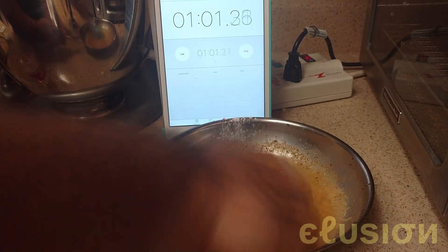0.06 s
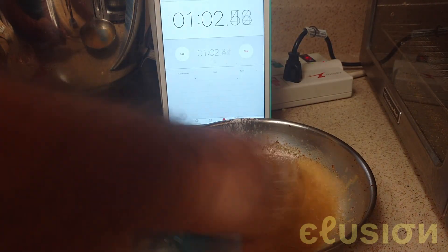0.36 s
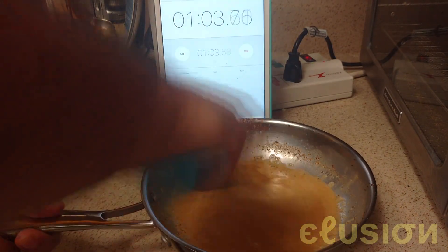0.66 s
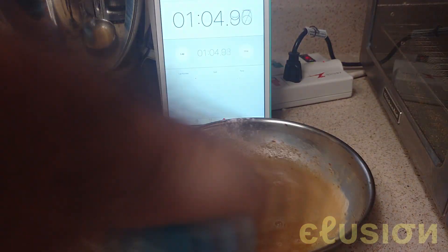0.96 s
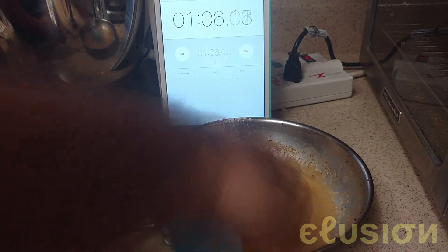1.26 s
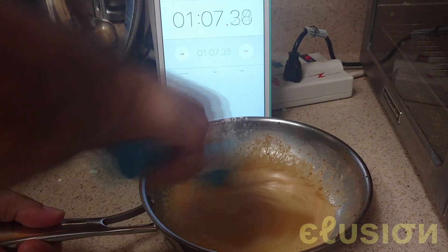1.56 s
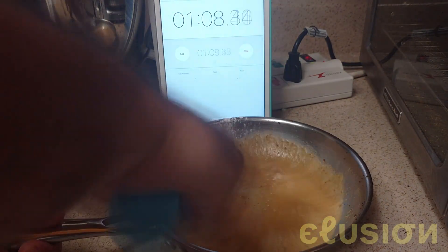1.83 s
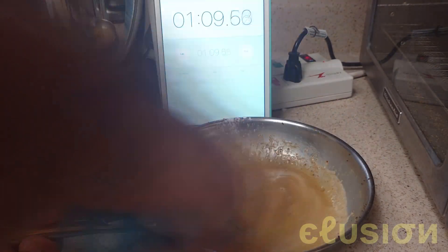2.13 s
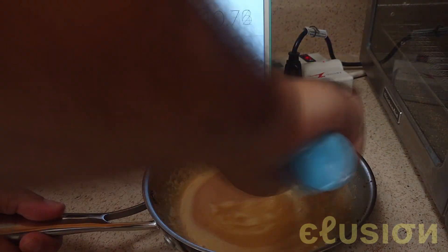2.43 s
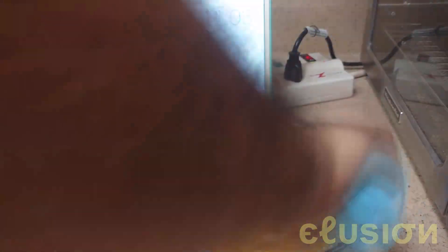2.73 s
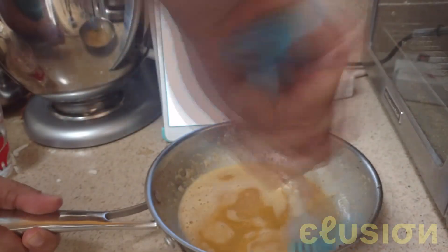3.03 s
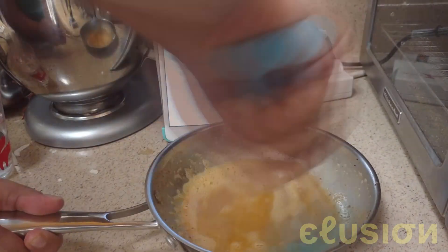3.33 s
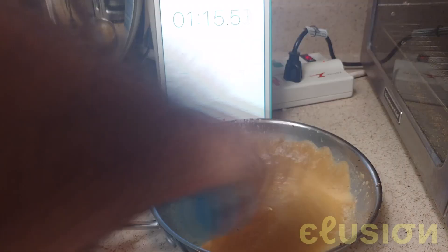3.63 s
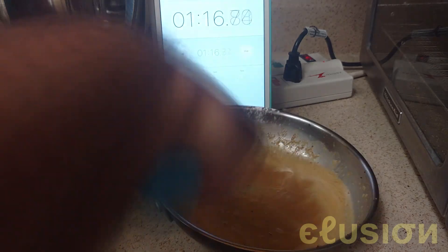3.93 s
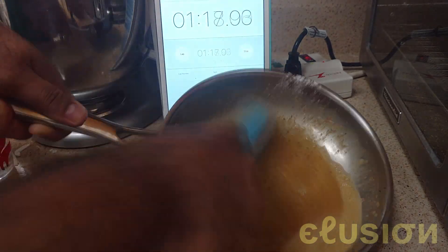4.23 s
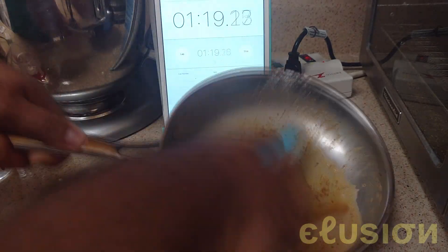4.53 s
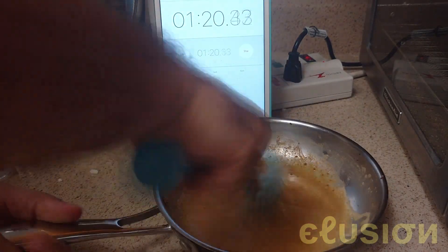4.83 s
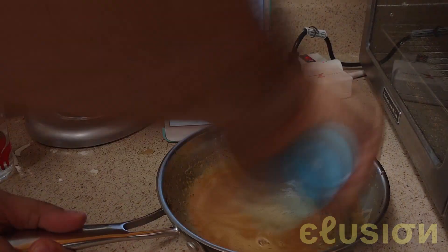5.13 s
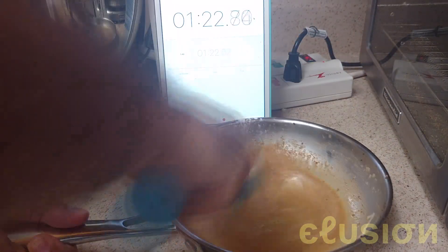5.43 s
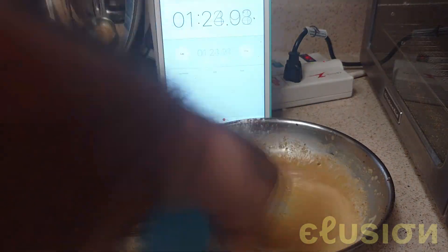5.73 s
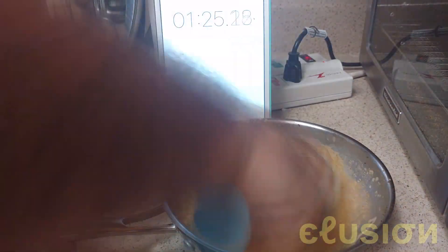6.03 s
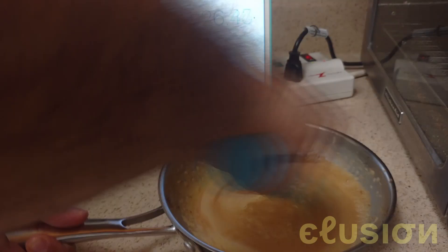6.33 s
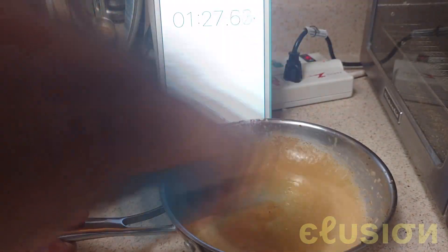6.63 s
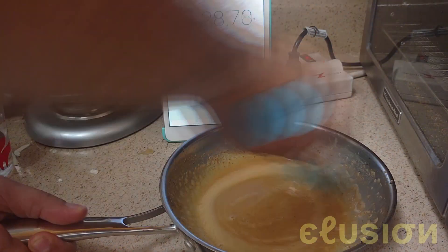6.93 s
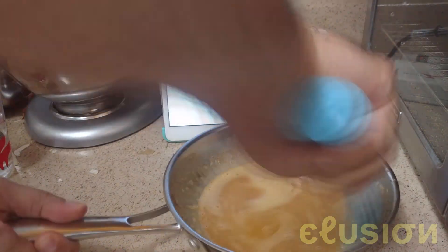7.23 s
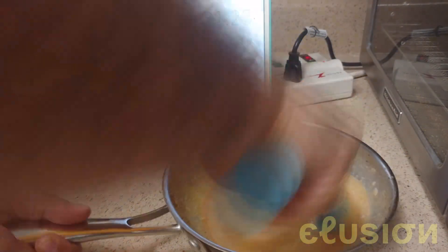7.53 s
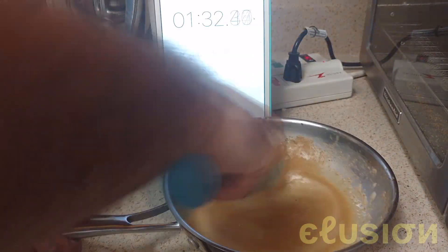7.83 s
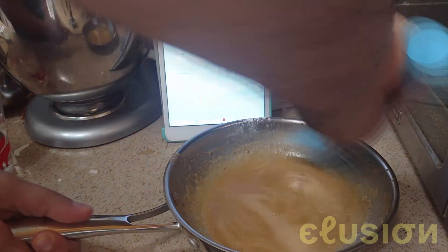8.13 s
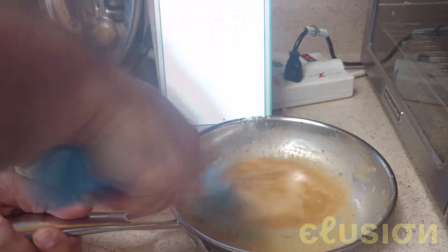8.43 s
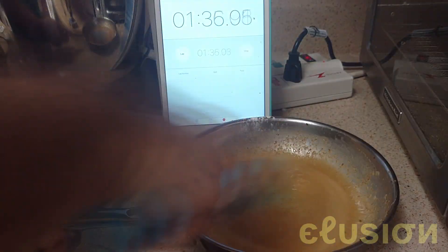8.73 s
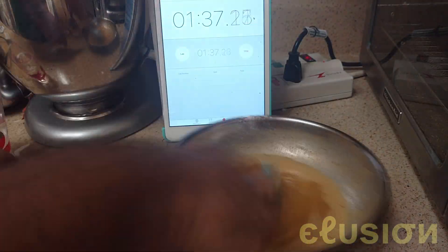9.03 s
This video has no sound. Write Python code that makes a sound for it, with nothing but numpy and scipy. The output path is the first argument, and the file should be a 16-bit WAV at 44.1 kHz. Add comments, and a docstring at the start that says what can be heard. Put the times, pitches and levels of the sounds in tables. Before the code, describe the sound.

A plastic brush scrubs a steel frying pan close to the microphone in a kitchen. Its bristles hiss and rasp in quick, continuous circles, while wet paste squelches and plops and the brush head knocks dully on the pan. Midway, harder scrapes make the steel ring briefly, with a few sharp ticks. A faint appliance hum stops about three quarters through, and the scrubbing carries on.

```python
"""Kitchen counter: a plastic brush scrubs a steel frying pan through wet paste, in quick circles.
Bristles hiss and rasp, each stroke rubs a dull sound out of the pan, air pockets plop and squelch.
The brush head knocks and ticks on the steel; hard scrapes make the wall sing. The pan bumps the
counter, less while briefly tilted, then is set down. An appliance hums and stops; the room murmurs."""
import sys
import numpy as np
from scipy import signal
from scipy.fft import rfft, irfft, next_fast_len
from scipy.io import wavfile

SR = 44100
rng = np.random.default_rng(int(sys.argv[2]) if len(sys.argv) > 2 else 0)


def master_out(mix):
    """Clip the mix to full scale and print it as 16-bit PCM to the path in sys.argv[1]."""
    frames = np.transpose(np.atleast_2d(mix))
    ceiling = np.clip(frames, -1, 1)
    pcm = np.round(ceiling * 32767).astype(np.int16)
    wavfile.write(sys.argv[1], SR, pcm)


N = 408807
TIME_S = np.arange(N) / SR
FREQS_HZ = np.maximum(np.arange(N // 2 + 1) * SR / N, 1)
TILT_START_S, TILT_LENGTH_S = 4.1, 0.595


def from_db(db):
    """Decibels to gain."""
    return 10 ** (np.asarray(db) / 20)


def rms_one(x):
    """Scale to unit rms."""
    return x / np.sqrt(np.mean(x ** 2) + 1e-20)


def at_hz(points):
    """Interpolate (freq_hz, value) rows over log frequency."""
    hz, value = np.transpose(points)
    return np.interp(np.log(FREQS_HZ), np.log(hz), value)


def peak(hz, width_hz):
    """Magnitude response of one resonance, 1 on top."""
    return abs(1 / (1 + 1j * (FREQS_HZ ** 2 - hz ** 2) / (FREQS_HZ * width_hz)))


def colour(x, response):
    """Filter by a frequency response; unit rms."""
    size = next_fast_len(N, real=True)
    gains = np.interp(np.arange(size // 2 + 1) * SR / size, FREQS_HZ, response)
    return rms_one(irfft(rfft(x, size) * gains, size)[..., :N])


def resonate(x, hz, q):
    """Two-pole band-pass."""
    return signal.lfilter(*signal.iirpeak(hz, q, fs=SR), x)


def cut_below(x, hz):
    """High-pass: a small source radiates little bass."""
    return signal.sosfilt(signal.butter(3, hz, "high", fs=SR, output="sos"), x + 1e-18)


def drift(rate_hz):
    """Slow random curve, spread about 1."""
    knots = rng.standard_normal(40000)
    return np.sqrt(3 / 2) * np.interp(TIME_S * rate_hz * 2, np.arange(len(knots)), knots)


def grains(per_s, spread_db):
    """Random clicks of uneven size."""
    clicks = (rng.random(N) < per_s / SR) * rng.choice([-1, 1], N)
    return rms_one(clicks * from_db(spread_db * np.minimum(rng.exponential(1, N), 4)))


def pair(mid, side, correlation):
    """Two channels with a given correlation."""
    return np.sqrt(1 + correlation) * mid + np.sqrt(1 - correlation) * side * np.array([[1], [-1]])


def swell(peak_s, spread_s, lean=0):
    """Bell envelope; lean makes the fall slower than the rise."""
    out = np.zeros(N)
    span = slice(max(int((peak_s - 9 * spread_s) * SR), 0), int((peak_s + 12 * spread_s) * SR))
    t = TIME_S[span] - peak_s
    out[span] = np.exp(-(t / (2 * spread_s * (1 + lean * np.sign(t)))) ** 2)
    return out


def gate(start_s, length_s, attack_s, release_s):
    """Soft rise, hold, soft fall."""
    out = np.zeros(N)
    span = slice(max(int((start_s - 5 * attack_s) * SR), 0),
                 int((start_s + length_s + 5 * release_s) * SR))
    t = TIME_S[span] - start_s
    out[span] = (1 + np.tanh(t / attack_s)) * (1 + np.tanh((length_s - t) / release_s)) / 4
    return out


def strike(start_s, level_db, hz, t60_s):
    """One or more blows ring a damped mode."""
    blows = np.full(N, 1e-18)
    blows[(np.atleast_1d(start_s) * SR).astype(int)] = from_db(level_db)
    radius, step_rad = np.exp(-np.log(1000) / (t60_s * SR)), 2 * np.pi * hz / SR
    return signal.lfilter([0, np.sin(step_rad)], [1, -2 * radius * np.cos(step_rad), radius ** 2], blows)


def strokes(ends_db=-2.0):
    """Scrape, rasp and push envelopes: bristles start, hold and stop; the hand bears down midway."""
    # Strokes, turn to turn: start_s, length_s, scrape_db, push_db, rasp_offset_db
    stroke_rows = [(0, 0.079, -29.5, -45.5, -6), (0.077, 0.052, -34.5, -47.5, -4.5),
                   (0.103, 0.19, -33, -49.5, -3.5), (0.308, 0.083, -30.5, -45.5, -4.5),
                   (0.412, 0.03, -29.5, -62.0, -7), (0.459, 0.1, -31.5, -48, -6),
                   (0.561, 0.059, -34, -53, -5), (0.626, 0.036, -32, -44, -13), (0.66, 0.15, -33, -47, -3),
                   (0.813, 0.16, -33.5, -48.0, -5), (0.954, 0.093, -34, -52, -6),
                   (1.05, 0.16, -32.5, -49, -3), (1.208, 0.065, -29.5, -44, -5.5),
                   (1.286, 0.066, -30.5, -44.5, -5), (1.353, 0.1, -31, -46.5, -4),
                   (1.44, 0.1, -32.5, -50, -5.5), (1.557, 0.067, -34, -38.5, -4),
                   (1.635, 0.032, -33, -48.5, -7), (1.677, 0.058, -32, -45, -2),
                   (1.739, 0.17, -32, -52, -5.5), (1.879, 0.12, -36.5, -49, -5),
                   (1.983, 0.19, -36.3, -47, -1.5), (2.167, 0.13, -34.5, -47, -2.5),
                   (2.307, 0.13, -34, -63, -1), (2.429, 0.1, -36, -46.5, -1),
                   (2.536, 0.1, -37.5, -45.5, -3.5), (2.663, 0.029, -32.5, -45, -7),
                   (2.707, 0.031, -32.5, -62, -1), (2.759, 0.038, -34.5, -48, -5),
                   (2.845, 0.03, -37.5, -52, -2.0), (2.895, 0.074, -34, -49, -8.5),
                   (2.983, 0.029, -35.5, -54, -3), (3.035, 0.056, -34.5, -45.5, -7.5),
                   (3.11, 0.1, -34.5, -49.5, -3.5), (3.237, 0.042, -31.5, -48, -0.5),
                   (3.3, 0.027, -38.5, -57.0, -6), (3.358, 0.039, -32.0, -44, -8.5),
                   (3.399, 0.044, -32.5, -48.5, -4.5), (3.446, 0.059, -37, -55, -3),
                   (3.525, 0.076, -33, -50.5, -3.5), (3.578, 0.13, -38, -48.5, 0.5),
                   (3.676, 0.15, -34.5, -50, -5), (3.805, 0.15, -34.5, -49, -7.5),
                   (3.972, 0.14, -32, -52.5, -5.5), (4.13, 0.042, -30, -45, -10),
                   (4.184, 0.048, -34.5, -63.5, -10), (4.234, 0.059, -31.5, -47.5, -11),
                   (4.29, 0.15, -34, -59, -13), (4.438, 0.031, -32, -46.5, -7),
                   (4.488, 0.17, -38, -62, -10), (4.678, 0.12, -37, -45.5, -9),
                   (4.796, 0.029, -34, -49, -7), (4.846, 0.15, -34.5, -53, -3.5),
                   (5.012, 0.03, -36, -44, -6), (5.065, 0.14, -36.5, -47, -3),
                   (5.221, 0.19, -35.5, -49, -2.5), (5.412, 0.077, -35.5, -46, -2.5),
                   (5.489, 0.09, -35, -49, -0.5), (5.571, 0.1, -33.5, -46.5, -3),
                   (5.674, 0.11, -31.5, -48, -8), (5.829, 0.14, -36, -48, -2), (5.972, 0.11, -34, -42, -5),
                   (6.107, 0.1, -35, -49, -4.5), (6.214, 0.16, -36, -52, -3.5), (6.378, 0.16, -36, -55, -6),
                   (6.541, 0.16, -35, -51, -5.5), (6.716, 0.14, -35, -47, -1.5),
                   (6.871, 0.17, -36.5, -51.5, -0.5), (6.991, 0.1, -41, -58, 7),
                   (7.124, 0.082, -39.5, -45, 2), (7.249, 0.076, -34.5, -44.5, -6.5),
                   (7.328, 0.1, -34.5, -56, -7), (7.443, 0.13, -38, -51.5, -3), (7.596, 0.2, -38.5, -52, 2),
                   (7.817, 0.068, -36, -43.5, -1), (7.888, 0.16, -36.5, -51, -2),
                   (8.075, 0.11, -42, -52, -3), (8.172, 0.068, -36, -48, -2),
                   (8.27, 0.076, -38.5, -65, 1.5), (8.382, 0.19, -34.5, -47.5, -3),
                   (8.578, 0.11, -35.5, -50.5, -2.5), (8.683, 0.1, -34, -44.5, -5.5),
                   (8.786, 0.12, -36.5, -50.5, -3.5), (8.913, 0.12, -33.5, -49, -9.5),
                   (9.044, 0.086, -37, -46.5, -5), (9.133, 0.091, -35, -43, -5.5),
                   (9.214, 0.074, -33, -55, -8)]
    # Power floors: the brush never quite leaves the pan.
    scrape, rasp, push = from_db([[-46.5], [-46.5], [-57.5]]) ** 2 * np.ones(N)
    for start_s, length_s, scrape_db, push_db, rasp_offset_db in stroke_rows:
        span = slice(max(int((start_s - length_s) * SR), 0), int((start_s + 2 * length_s) * SR))
        bearing = swell(start_s + 0.49 * length_s, spread_s=0.17 * length_s)[span]
        contact = gate(start_s, length_s, attack_s=0.0058, release_s=0.0097)[span]
        power = contact * (from_db(scrape_db) * (bearing + (1 - bearing) * from_db(ends_db))) ** 2
        scrape[span] += power
        rasp[span] += power * from_db(rasp_offset_db) ** 2
        push[span] += (from_db(push_db) * bearing) ** 2
    return np.sqrt(scrape), np.sqrt(rasp), np.sqrt(push)


def flicks():
    """Bristles catch and flick free: centred where the pan radiates them, diffuse in the treble."""
    # Left-right likeness: freq_hz, correlation
    likeness = [(1500, 0.2), (1900, 0.3), (2650, 0.75), (3000, 0.5), (3300, 0.8), (3700, 0.78),
                (3950, 0.57), (4500, 0.12), (6000, 0.13), (15000, 0)]
    shared, left, right = [grains(per_s=11000, spread_db=2.0) for _ in range(3)]
    correlation = np.clip(at_hz(likeness), .01, .99)
    parts = [(shared, correlation), (np.array([left, right]), 1 - correlation)]
    return sum(np.sqrt(share.mean()) * colour(x, np.sqrt(share)) for x, share in parts)


def steel():
    """Frequency response of the pan lying on the counter."""
    # Pan modes: freq_hz, width_hz, gain_db
    modes = [(272, 63, 11.3), (438, 130, 6.6), (621, 34, 3.6), (740, 200, 2.6), (920, 21, 4.6),
             (1134, 54, 6.3), (1850, 21, 10), (3160, 120, 1.3), (3346, 72, 3.5), (3560, 73, 1.7),
             (3170, 800, 2.1)]
    return from_db(sum(gain_db * peak(hz, width_hz) ** 2 for hz, width_hz, gain_db in modes))


def wall_ring(x, lift_db=1.0, swing_db=4.5):
    """The circling brush favours now one wall mode, now another, at random."""
    # Wall modes: freq_hz, width_hz
    modes = [(3060, 60), (3200, 64), (3340, 120), (3490, 88), (3640, 240)]
    ringing = sum(resonate(x, hz, hz / width_hz) * (from_db(lift_db + swing_db * np.tanh(drift(9))) - 1)
                  for hz, width_hz in modes)
    return rms_one(x + ringing)


def shimmer(x, depth_db=2.5):
    """Tufts of different length catch and let go, each briefly colouring a narrow band."""
    out = x
    for hz in np.geomspace(3000, 12000, 9):
        gain = from_db(depth_db * np.tanh(drift(16)) - 0.37)
        out = out + resonate(x, hz, q=7) * (gain - 1)
    return out


def bristles(scrape, rasp, push, bend_exponent=0.32):
    """Tips hiss and swish; a harder push bends the shafts, which rasp."""
    # Swish within the hiss: time_s, lift_db
    swish_curve = [(0, 4), (1.3, 4.5), (1.92, 1.5), (2.36, 2.5), (2.68, -2.5), (3.16, -4), (3.24, 3.5),
                   (3.5, 1), (3.96, 3), (4.48, -4), (4.84, 1), (5.3, 2), (6.7, 1.5), (7.16, -2), (7.7, 2),
                   (8.25, -5), (8.5, 0.5), (9.27, 2)]
    # Tip spectrum: freq_hz, gain_db
    hiss_spectrum = [(1000, -80), (2800, -30), (4400, -2.5), (4900, -3.5), (5300, -0.5), (6200, 0),
                     (6600, -0.5), (7100, -1.5), (8100, 0.5), (8900, -3), (10500, -4), (12500, -5.8),
                     (14200, -7), (15600, -9)]
    # Shaft spectrum: freq_hz, gain_db
    rasp_spectrum = [(900, -65), (1500, -10), (1850, -4), (2050, -2.5), (2350, 2.5), (2650, -1.5),
                     (2950, -2), (3250, -3), (3650, -4), (4150, -1.5), (4600, -8.5), (6500, -31.5)]
    lift = from_db(np.interp(TIME_S, *np.transpose(swish_curve)))
    clicks, tip_response = flicks(), from_db(at_hz(hiss_spectrum))
    hiss = colour(clicks, tip_response)
    swish = colour(clicks, tip_response * peak(5830, width_hz=2700) ** 2)
    tips = (hiss + 0.5 * (lift - 1) * swish) / lift ** 0.5 * from_db(drift(18) - 0.5)
    shafts = wall_ring(colour(clicks, from_db(at_hz(rasp_spectrum)) * steel()))
    shafts *= from_db(1.27 * drift(40) - 4.0)
    return shimmer(scrape * tips + rasp * rms_one(push) ** bend_exponent * shafts)


def rub(push):
    """Each push drags the brush in small slips over the bottom, driving its damped modes."""
    # Rub spectrum: freq_hz, gain_db
    spectrum = [(40, -44), (120, -27), (195, -17.5), (300, -5.5), (550, -2.5), (800, -4), (1100, -9.5),
                (1300, -9), (1700, -5), (2050, -2.5), (2600, -24), (5000, -45)]
    slips = pair(grains(2500, 2.87), rng.standard_normal(N), correlation=0.82)
    return from_db(2.5) * push * colour(slips, from_db(at_hz(spectrum)) * steel())


def thuds(push, uneven_db=5.0, tilted_db=-9):
    """The pan rocks unevenly under the strokes and bumps the counter, less while tilted."""
    bumps = pair(grains(300, 3.8), grains(330, 3.1), correlation=0.25)
    counter = colour(bumps, peak(112.3, width_hz=35) ** 1.3)
    tilted = gate(TILT_START_S, TILT_LENGTH_S, attack_s=.015, release_s=.015)
    gain_db = -63.0 + uneven_db * np.tanh(drift(5.4)) + tilted_db * tilted
    return from_db(gain_db) * rms_one(push) ** 0.76 * counter


def appliance(hum_hz=360.4, level_db=-47, end_s=6.91, fade_s=0.075, waver_rad=0.52, waver_db=1.83):
    """A hum that wavers in phase and level, then stops."""
    running = np.clip((end_s - TIME_S) / fade_s, 0, 1)
    tone = np.sqrt(2) * np.sin(2 * np.pi * hum_hz * TIME_S + waver_rad * drift(5))
    return from_db(level_db + waver_db * drift(6)) * running * tone


def room(level_db=-55.0):
    """Steady low murmur of the kitchen."""
    # Room spectrum: freq_hz, gain_db
    spectrum = [(20, -28), (40, -24), (52, -12), (70, -17), (114, -7.5), (155, -9), (205, -1.5), (270, 0),
                (450, -0.5), (1000, -36), (4000, -47), (16000, -63)]
    air = pair(*rng.standard_normal((2, N)), correlation=0.3)
    return from_db(level_db) * colour(air, from_db(at_hz(spectrum)))


def plops(attack_s=0.0015, t60_s=0.078):
    """Single air pockets open in the paste, each ringing briefly at one pitch."""
    # Pockets: start_s, level_db, pitch_hz
    pockets = [(.178, -34, 448), (3.134, -33.5, 464), (5.063, -28.5, 618), (5.086, -33, 495),
               (5.175, -32, 283), (6.039, -35, 522), (8.208, -41, 268), (8.428, -35, 430),
               (8.718, -32, 440)]
    out = np.zeros(N)
    for start_s, level_db, pitch_hz in pockets:
        span = slice(int(start_s * SR) + 1, int((start_s + 2 * t60_s) * SR))
        t = TIME_S[span] - start_s
        envelope = (1 - np.exp(-t / attack_s)) * np.exp(-np.log(1000) * t / t60_s)
        out[span] += from_db(level_db) * envelope * np.sin(2 * np.pi * pitch_hz * t)
    return out


def knocks(pivot_hz=500):
    """The head bumps the wall through paste, waking low, counter-damped modes; hard blows reach higher."""
    # Blows: start_s, level_db, hardness_db_per_octave
    blows = [(0.7033, -23, -4), (1.5942, -27.5, 6), (2.0665, -25, -2), (2.401, -23.5, -2), (2.4115, -31, 2),
             (3.1878, -20, 1), (4.116, -36, 5), (4.7114, -20, -2), (5.829, -25.5, -7), (6.732, -28, 3),
             (7.698, -29, 0), (7.7051, -28, -2), (7.9464, -24.5, 6.5), (8.0742, -23.5, -2)]
    # Low pan modes: freq_hz, gain_db, t60_s
    modes = [(302, -18, 0.019), (445, -5, 0.024), (606, -7.5, 0.022), (896, -8.5, 0.016),
             (1160, -12, 0.0056)]
    start_s, level_db, hardness = np.transpose(blows)
    rung = sum(strike(start_s, level_db + gain_db + hardness * np.log2(hz / pivot_hz), hz, t60_s)
               for hz, gain_db, t60_s in modes)
    return cut_below(rung, hz=266)


def squelches(top_hz=1400, lean=0.12):
    """Air pockets in the paste burst in quick clusters of dull pops, coloured by the pan."""
    # Clusters: middle_s, level_db, spread_s, pitch_hz
    clusters = [(.707,-34.5,0.0036,510), (1.58,-46,0.0061,1100), (1.6,-37,0.0044,750),
                (2.067,-32.5,0.0035,565), (2.412,-37,0.0077,500), (2.73,-38,0.0088,560),
                (3.054,-36.5,0.004,487), (3.195,-35,0.005,750), (3.5,-39,0.0033,540),
                (3.634,-34.5,0.0032,328), (4.121,-41,0.0081,750), (4.69,-33.5,0.0068,650),
                (4.711,-31.5,0.0024,534), (5.839,-31.5,0.0067,700), (6.738,-39.5,0.0065,680),
                (7.019,-38.5,0.0077,370), (7.705,-32.5,0.0075,580), (7.949,-35.5,0.0066,850),
                (8.08,-31.5,0.0056,614), (8.3,-40,0.0092,594), (8.431,-36.5,0.0066,416),
                (8.623,-41,0.0085,530)]
    pops = pair(grains(2600, 0.41), grains(5000, 2.5), correlation=0.69)
    pops = colour(pops, steel() ** 0.99 / np.sqrt(1 + (FREQS_HZ / top_hz) ** 8))
    out = np.zeros((2, N))
    for middle_s, level_db, spread_s, pitch_hz in clusters:
        span = slice(int((middle_s - .06) * SR), int((middle_s + .06) * SR))
        envelope = swell(middle_s - lean * spread_s, spread_s, lean)[span]
        q = 1 / from_db(0.5 * (level_db + 31))  # small pockets ring purer
        burst = resonate(pops[:, span] * envelope, pitch_hz, q)
        out[:, span] += from_db(level_db) * burst * np.sqrt(np.mean(envelope ** 2) / np.mean(burst ** 2))
    return from_db(1.1) * cut_below(out, hz=144)


def springs():
    """Bent tufts spring off the wall together in a short bright spray."""
    # Releases: middle_s, spread_s, level_db
    releases = [(2.735, 0.005, -37), (3.06, .009, -41), (3.256, 0.0065, -45), (3.38, 0.011, -40),
                (5.137, 0.0065, -35.5), (7.02, .01, -40), (7.15, 0.01, -36), (8.208, 0.015, -39),
                (8.425, .013, -39)]
    clicks = np.array([grains(per_s=7000, spread_db=7.0) for _ in range(2)])
    envelope = sum(from_db(db) * swell(middle_s, spread_s) for middle_s, spread_s, db in releases)
    return envelope * colour(clicks, peak(8300, width_hz=1800) ** 2)


def singing_pan(low_width_hz=155, high_width_hz=90):
    """Hard scrapes wake a low and a high wall mode, pitched by where the brush bears."""
    # Scrapes: middle_s, spread_s, level_db, low_offset_db, low_hz, high_hz
    scrapes = [(3.70, .008, -44, -17, 1800, 3250), (3.757, 0.015, -39.5, -1.5, 1760, 3180),
               (3.88, 0.01, -36.5, -1, 1660, 3290), (3.94, 0.022, -44, -9, 1679, 3160),
               (4.025, 0.013, -41.5, -4, 1720, 3140), (4.162, .0074, -42.5, -3, 1710, 3160),
               (4.258, .013, -36, -13, 1658, 3150), (4.36, 0.021, -45, -10, 1771, 3127),
               (4.562, .0072, -45, -3, 1700, 3150), (4.62, 0.032, -49, -10, 1740, 3150),
               (6.615, 0.011, -45, -2, 1820, 3493), (6.97, 0.0084, -41, -11, 1830, 3030),
               (8.84, .014, -46, 1, 1840, 3310), (8.98, 0.012, -43, -1, 1851, 3320),
               (9.09, 0.014, -43, -2, 1720, 3181), (9.178, 0.019, -42, 2, 1835, 3321)]
    slips = pair(grains(3000, 3.8), grains(3000, 2.3), correlation=0.44)
    out = np.zeros((2, N))
    for middle_s, spread_s, level_db, low_offset_db, low_hz, high_hz in scrapes:
        span = slice(int((middle_s - 9 * spread_s) * SR), int((middle_s + 9 * spread_s) * SR))
        envelope = swell(middle_s, spread_s)[span]
        for hz, width_hz, offset_db in (low_hz, low_width_hz, low_offset_db), (high_hz, high_width_hz, 0):
            q = hz / width_hz
            sung = resonate(resonate(slips[:, span], hz, q), hz, q)
            out[:, span] += from_db(level_db + offset_db) * rms_one(sung) * envelope
    return out


def ticks():
    """Hard plastic strikes steel; heavier blows reach the low modes, pitch depends on the spot."""
    # Blows: start_s, level_db, weight_db, pitch_ratio
    blows = [(4.457, -28, -23, 1.02), (4.462, -25.5, -26, 0.99), (4.509, -36, 3, 1),
             (4.5122, -30.5, 7.5, 1), (4.520, -34.5, 6, 1), (9.1355, -25, 0, 1.045),
             (9.1398, -29, -10, 0.92)]
    # Steel modes: freq_hz, gain_db, t60_s, weight_share
    modes = [(460, 0.5, 0.037, 1), (1760, 1.5, 0.033, 0.7), (3143, -3.5, 0.046, 0),
             (3190, -12, 0.024, 0.44)]
    rung = sum(strike(start_s, level_db + gain_db + weight_share * weight_db, hz * pitch_ratio, t60_s)
               for start_s, level_db, weight_db, pitch_ratio in blows
               for hz, gain_db, t60_s, weight_share in modes)
    return cut_below(rung, hz=303)


def set_down():
    """The tilted pan lands on the counter with a soft thump."""
    return strike(TILT_START_S + TILT_LENGTH_S, level_db=-46.5, hz=103, t60_s=0.16)


def scene():
    """Brush, paste and pan close by, the kitchen behind."""
    scrape, rasp, push = strokes()
    brush = bristles(scrape, rasp, push) + rub(push) + springs()
    pan = thuds(push) + knocks() + singing_pan() + ticks() + set_down()
    return brush + pan + plops() + squelches() + appliance() + room()


def record(dry, notch_hz=2272.6, notch_width_hz=160, notch_db=24, cutoff_hz=15600):
    """Two microphone ports, each minus a late copy of the other: wide image, notched centre, top cut."""
    # Subtracted copy: freq_hz, share
    crossfeed = [(650, 0), (1050, 0.66), (3600, 0.72), (4500, 0.42), (5800, 0.23), (7500, 0.13),
                 (14000, 0.35)]
    # Port balance: freq_hz, left_minus_right_db
    port_balance = [(100, 0), (450, -1.5), (800, -1.7), (1145, 0.5), (1600, -2.5), (2000, -1.7), (2290, 0),
                    (3500, -0.5), (4300, -1.2), (5300, -5), (6300, -3.5), (7300, -2.5), (9200, -1),
                    (11000, -2.5), (13300, -5), (15000, -4.5)]
    # Port phase: freq_hz, left_lead_rad
    port_lead = [(3800, 0), (4600, .5), (8100, 1.08), (11000, 1.4), (14100, 2.5), (15600, 1)]
    size = next_fast_len(N + 2000, real=True)
    hz = np.arange(size // 2 + 1) * SR / size
    share, balance_db, lead_rad = [np.interp(hz, FREQS_HZ, at_hz(table))
                                   for table in (crossfeed, port_balance, port_lead)]
    ports = rfft(dry, size)
    late = np.exp(-2j * np.pi * hz / notch_hz) * ports[::-1]  # by one period of notch_hz
    wide = (ports - share * late) / np.sqrt(1 + share ** 2)
    sides = np.array([[.5], [-.5]])
    wide *= from_db(sides * balance_db) * np.exp(1j * sides * lead_rad)
    notch = from_db(-notch_db / (1 + ((hz - notch_hz) / notch_width_hz) ** 4))
    heard = irfft(wide - (1 - notch) * wide.mean(axis=0), size)[:, :N]
    return signal.sosfilt(signal.ellip(12, .1, 80, cutoff_hz, fs=SR, output="sos"), heard)


dry = scene()
out = record(dry)
master_out(out)
```